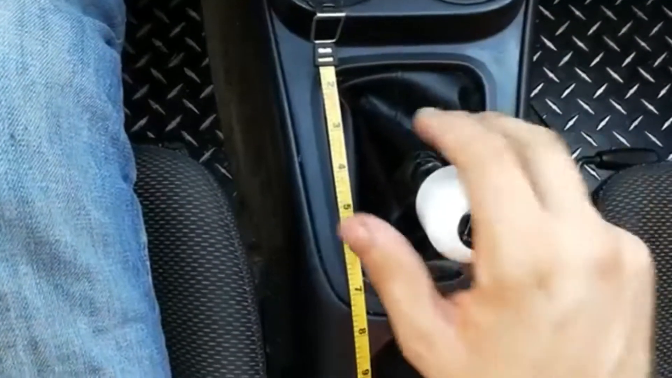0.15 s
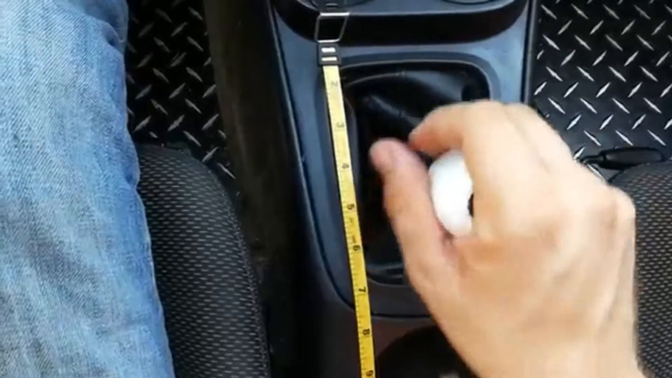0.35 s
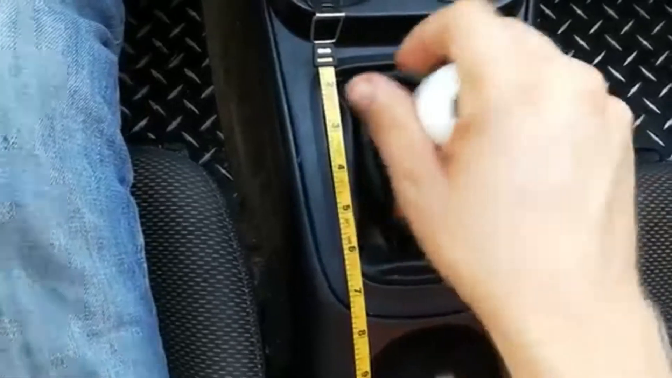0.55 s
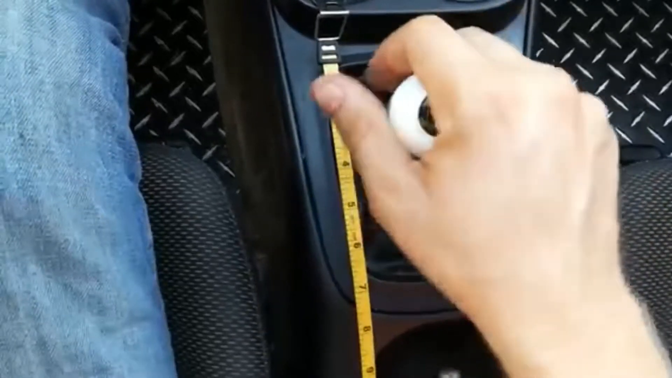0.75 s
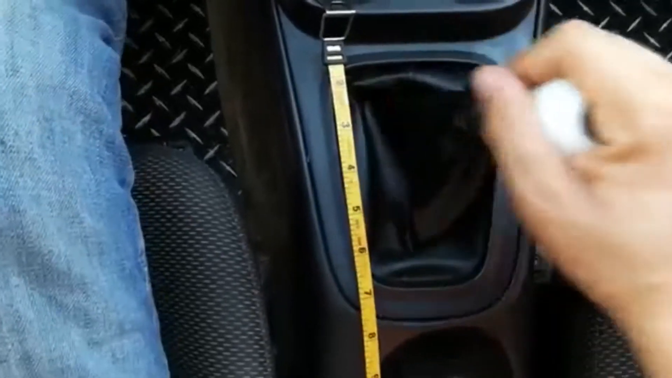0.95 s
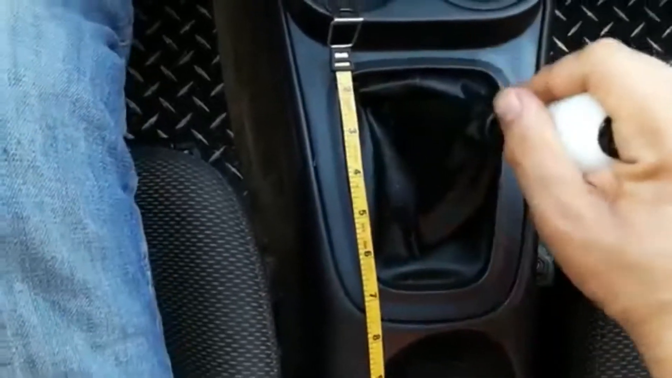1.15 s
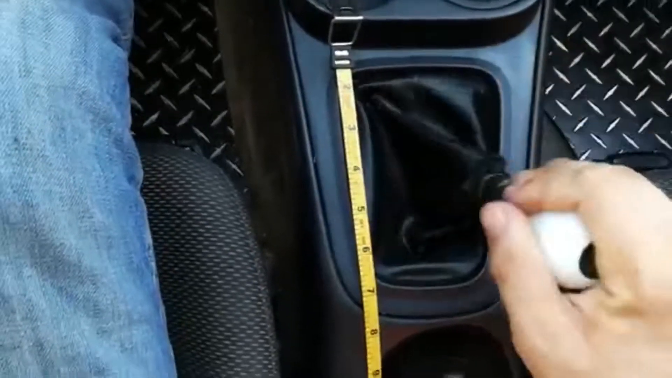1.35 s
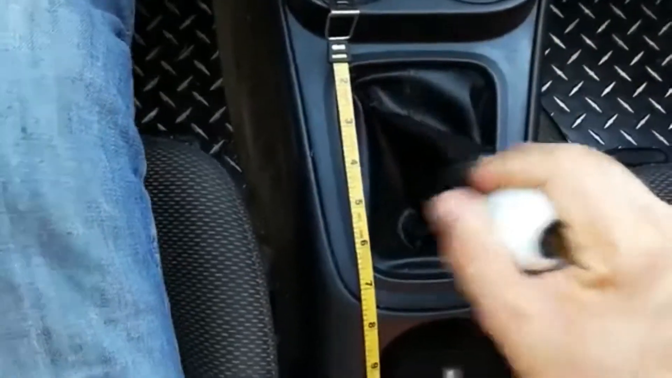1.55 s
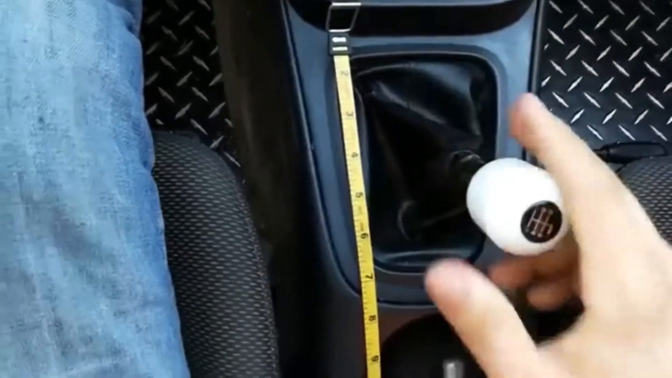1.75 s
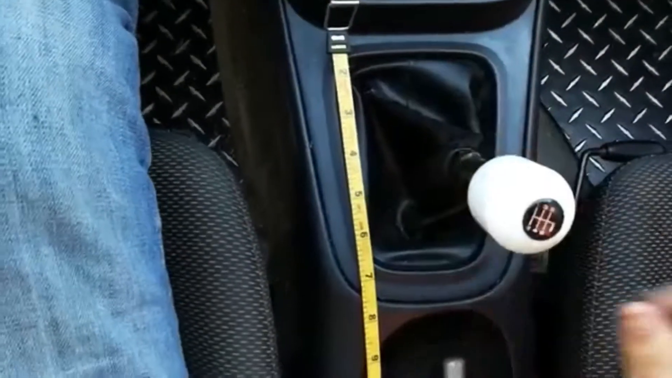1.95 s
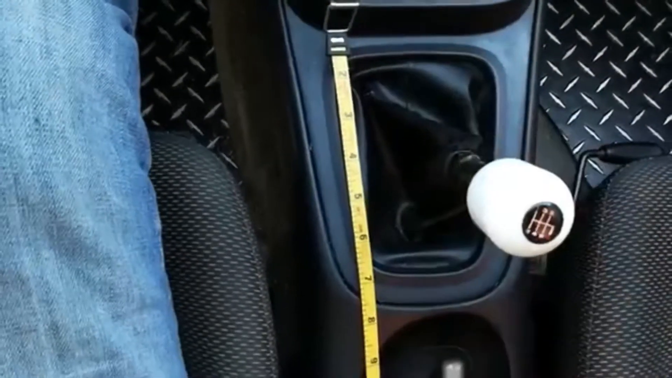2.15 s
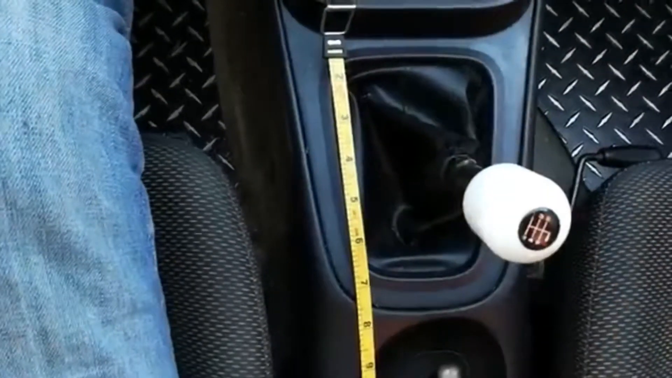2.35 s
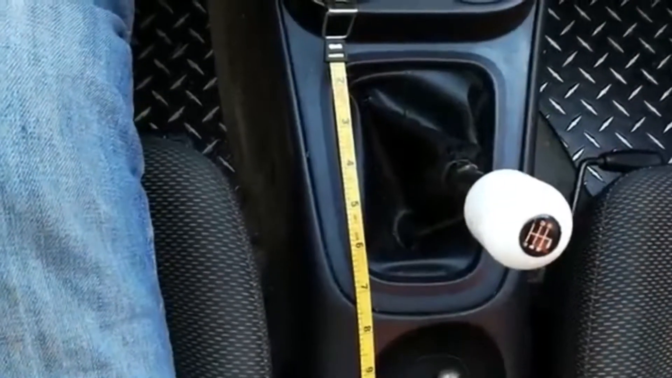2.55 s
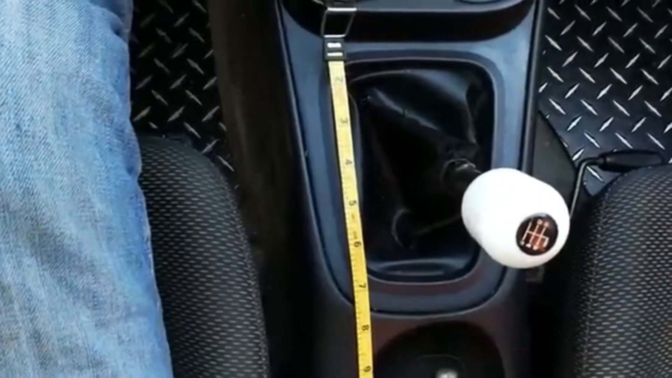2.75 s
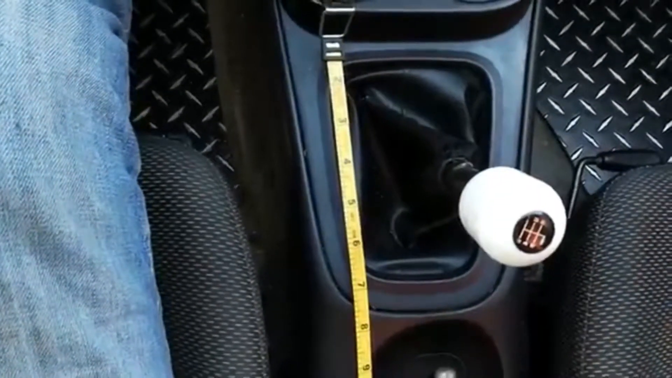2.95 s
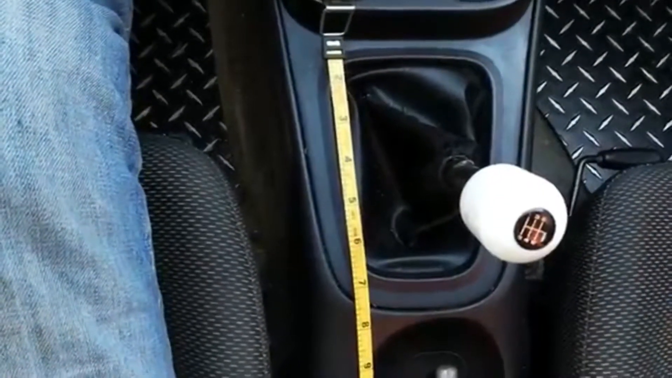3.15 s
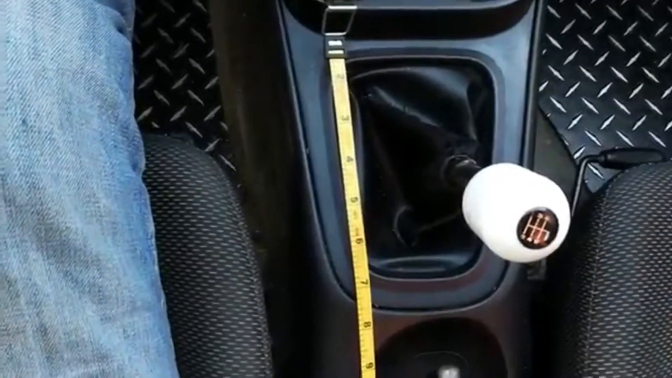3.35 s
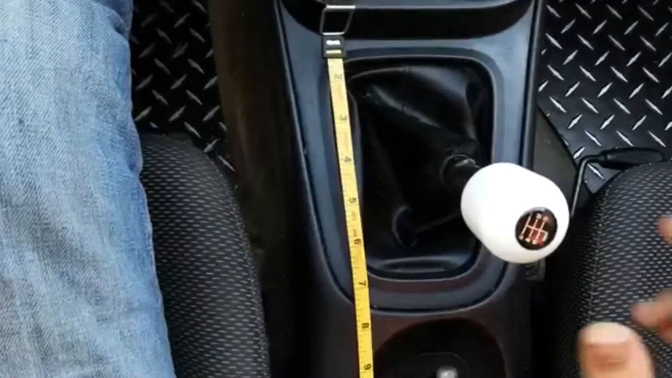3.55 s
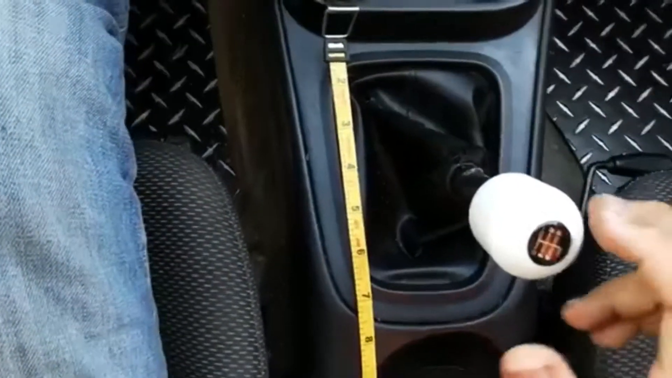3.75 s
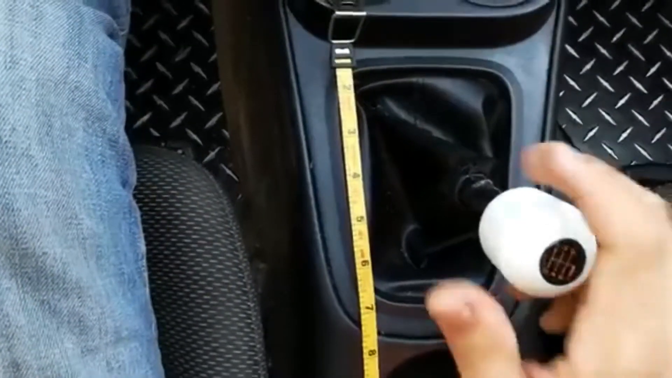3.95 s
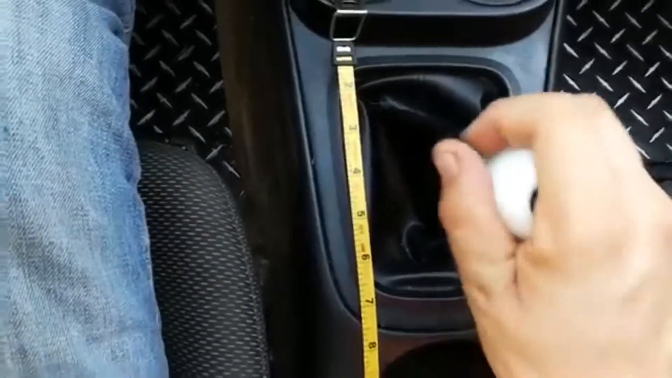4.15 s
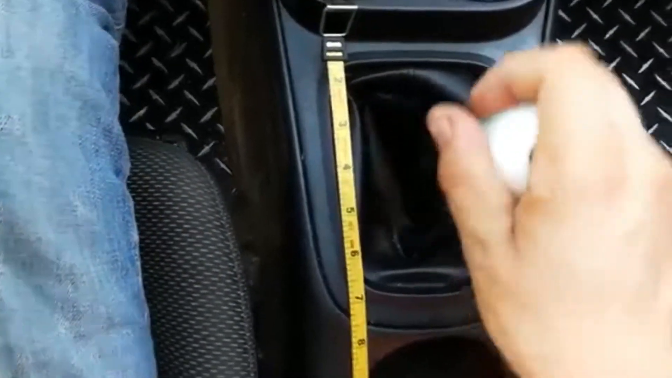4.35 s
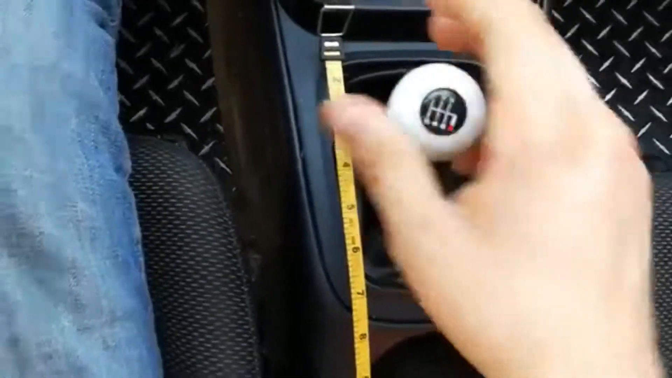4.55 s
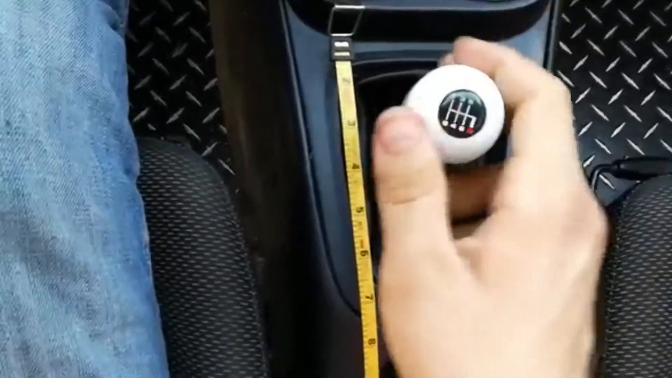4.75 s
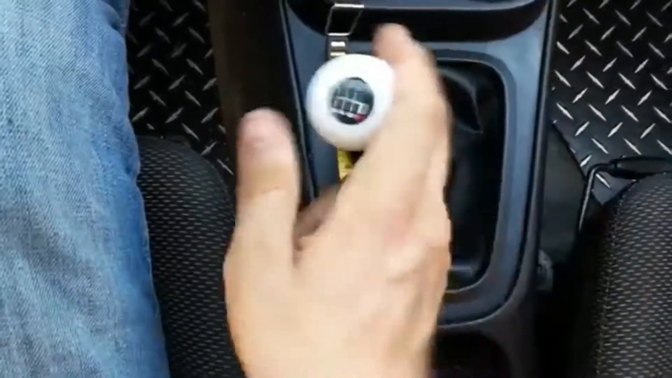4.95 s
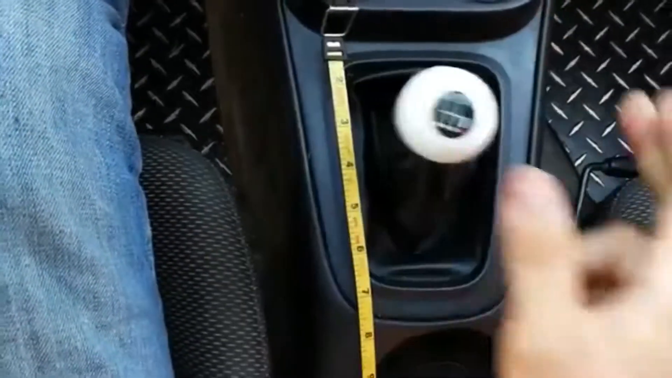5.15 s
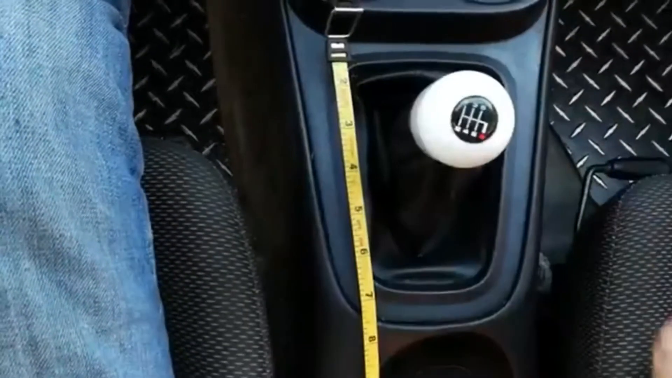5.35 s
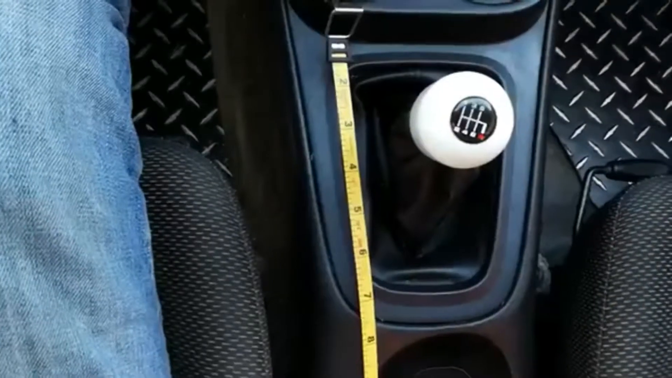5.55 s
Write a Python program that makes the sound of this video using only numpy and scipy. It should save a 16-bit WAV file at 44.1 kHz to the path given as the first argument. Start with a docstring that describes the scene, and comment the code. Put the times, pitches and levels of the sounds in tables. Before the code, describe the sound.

Inside a parked car, a hand works a short gear lever close to the microphone. A quick run of metal clicks, brief scrapes and dull thumps through the console fills the first second and a half. After a pause with one faint tick, the lever snaps through two more shifts, with the sharpest click and a cluster of clunks. Faint hiss, rumble and motor hum lie underneath.

```python
"""Inside a parked car, a hand throws a short gear lever from gate to gate, close to a two-microphone phone.
Each stop thumps the floor pan, console and trim. The steel linkage clicks as it makes contact and
scrapes as it slides, skin brushes the knob, and the cabin answers briefly.
Underneath, a faint motor hum and outside rumble seep in below the microphone hiss."""
import sys
import numpy as np
from scipy import signal
from scipy.fft import rfft, irfft, next_fast_len
from scipy.io import wavfile
from scipy.ndimage import uniform_filter1d

SR = 44100
rng = np.random.default_rng(int(sys.argv[2]) if len(sys.argv) > 2 else 0)


def unload_wav(signal):
    """Save mono or channel-first audio to the path in sys.argv[1] as 16-bit WAV at rate SR, clipped to [-1, 1]."""
    wavfile.write(
        sys.argv[1],
        SR,
        np.round(np.clip(np.atleast_2d(signal).T, -1, 1) * 32767).astype(np.int16),
    )


N = 246959
TIME = np.arange(N) / SR

# Resonances of the panels and the lever's parts: (frequency [Hz], level [dB], t60 [s])
CONSOLE_MODES = [(116.74, -1.5, 0.1422), (135.7, 0, 0.1884), (218.8, -5, 0.0752)]
TRIM_MODES = [(278.54, -2, 0.0505), (324.2, 1.5, 0.0759), (352.5, 0.5, 0.0353), (528.9, -7.5, 0.062)]
KNOB_MODES = [(666, 2.5, 0.01103), (829.5, -2, 0.02514), (984.8, -2, 0.02454)]
ROD_MODES = [(1432.6, -3.5, 0.0107), (1731, -0.09, 0.01178), (2101, 0.75, 0.0051)]
FORK_MODES = [(2904, -1, 0.00315), (3588, -6, 0.0105), (3658, -10, 0.0169), (4243, -0.5, 0.00542),
              (4540, -46.5, .012), (6308, -21, 0.0207)]


def undb(db):
    """Decibels to gain."""
    return 10 ** (np.asarray(db) / 20)


def level(x, db):
    """Scale to an rms level."""
    return x * undb(db) / np.sqrt(np.mean(x ** 2))


def colour(x, curve, lag_ms=0.):
    """EQ along a curve of (frequency [Hz], gain [dB]), with an optional delay."""
    hz, db = np.transpose(curve)
    size = next_fast_len(N)
    f = np.arange(size // 2 + 1) * SR / size
    gain = undb(np.interp(np.log(f + 1), np.log(hz), db))
    delay = np.exp(-2j * np.pi * f * lag_ms / 1000)
    return irfft(rfft(x, size) * gain * delay, size)[:N]


def wander(rate_hz):
    """Smooth random drift with a spread near 1."""
    hold = int(SR / rate_hz)
    steps = np.repeat(rng.standard_normal(N // hold + 1), hold)
    return 1.3 * uniform_filter1d(uniform_filter1d(steps, hold), hold)[:N]


def ring(force, modes, spot_db=0.):
    """Decaying modes, neighbours in opposite phase; the strike spot favours some at random."""
    out = 0
    for k, (hz, db, t60) in enumerate(modes):
        r, w = np.exp(-np.log(1000) / (t60 * SR)), 2 * np.pi * hz / SR
        gain = (-1) ** k * undb(db + spot_db * rng.standard_normal())
        out = out + gain * signal.lfilter([0, r * np.sin(w)], [1, -2 * r * np.cos(w), r * r], force)
    return out


def facing(deg, off_axis_db):
    """Gains of three parts: full when struck along their axis, off_axis_db when struck square to it."""
    axes_deg = np.array([60, 180, 300])
    return undb(off_axis_db * (1 - np.cos(np.radians(deg - axes_deg))))


def cabin(x):
    """Three noises to stereo: one is the direct sound, two are each side's glass and trim reflections."""
    return x[0] + undb(-2.5) * x[1:]


def crack(x):
    """The broad, unringing top of metal contact."""
    return signal.sosfilt(signal.butter(2, [4500., 11500.], "band", fs=SR, output="sos"), x)


def mic_hiss():
    """Each capsule hisses on its own, the left a little louder."""
    # Tone of the hiss: (frequency [Hz], gain [dB])
    hiss_curve = [(470, -3), (800, 1.5), (928, 0.5), (1120, -0.5), (1220, 1), (2400, -1), (14400, -12.5),
                  (15300, -22)]
    return np.array([level(colour(rng.standard_normal(N), hiss_curve), db) for db in (-69.5, -71.3)])


def motor_hum():
    """A faint motor: narrow bands of noise waver like unsteady tones."""
    # Partials of the hum: (frequency [Hz], bandwidth [Hz], level [dB])
    partials = [(119, 8, -76), (238, 12, -77), (354, 6, -86)]
    return sum(level(signal.lfilter(*signal.iirpeak(hz, hz / width, SR), rng.standard_normal(N)), db)
               for hz, width, db in partials)


def ambience():
    """Outside rumble and motor hum arrive from the left, over a deep, centred rumble that swells."""
    # Tone of the outside rumble: (frequency [Hz], gain [dB])
    outside_curve = [(59, -25), (100, -16.5), (127, -17.5), (150, -4), (226, 3.5), (297, -4), (360, -8),
                     (446, -9), (1500, -25.5), (1950, -57.5), (3300, -120)]
    # Rise and fall of the deep rumble: (time [s], level [dB])
    swell = [(0.0, -63), (.5, -57.5), (1.74, -59.5), (3.37, -66), (4.46, -65), (4.9, -58.5), (5.08, -48),
             (5.29, -59.5), (5.6, -59.5)]
    near, spread, deep = rng.standard_normal((3, N))
    flicker = undb(1.5 * wander(4))
    left, right = [level(colour(x, outside_curve), -67) * flicker for x in (near, near + 0.33 * spread)]
    deep = level(colour(deep, [(12, -20.5), (25, 6.0), (60, 0), (120, -4.5), (200, -34.5), (400, -92)]), 0)
    deep *= undb(np.interp(TIME, *np.transpose(swell)) + 2.5 * wander(12))
    hum = motor_hum()
    return np.array([left + hum, colour(right + hum, [(1, 0.0043)], lag_ms=0.672)]) + deep


def hand_brushes():
    """Skin brushes the knob: soft, high swishes."""
    # Touches of the hand: (time [s], half length [s], level [dB])
    brushes = [(0.39, 0.0292, -70), (4.119, 0.023, -65.5)]
    envelope = sum(undb(db) * np.exp(-((TIME - s) / half) ** 4) for s, half, db in brushes)
    skin_band = signal.butter(2, [5000., 8000.], "band", fs=SR, output="sos")
    return envelope * level(signal.sosfilt(skin_band, cabin(rng.standard_normal((3, N)))), 0)


def stick_slip(slips_per_s, spread_db):
    """Friction grit: three streams of dense random slips of uneven size."""
    slips = rng.random((3, N)) < slips_per_s / SR
    return slips * rng.standard_normal((3, N)) * undb(spread_db * wander(150))


def lever_scrapes():
    """The sliding lever scrapes its guides in fine slips; the rod passes them on and shakes the panels."""
    # Lever travel: (start [s], peak [s], time to fall 20 dB [s], rod drive [dB], fork drive [dB])
    slides = [(0.336, 0.415, 0.16, -62.5, -68), (0.497, 0.537, 0.0573, -54, -70),
              (0.523, 0.602, 0.1018, -51, -60), (0.814, 0.825, 0.2928, -62, -68.5),
              (0.854, 1.011, 0.0547, -60, -58), (1.202, 1.214, 0.0491, -56, -59.5),
              (1.228, 1.349, 0.1025, -55.5, -56), (1.563, 1.573, 0.0419, -57, -52),
              (1.575, 1.581, 0.1256, -55, -66), (4.064, 4.104, 0.1086, -56, -67),
              (4.366, 4.381, 0.0914, -45, -59), (4.414, 4.453, 0.0338, -40.5, -55.5),
              (4.892, 4.901, 0.251, -53, -62), (5.042, 5.1, 0.0593, -51, -56.5),
              (5.106, 5.154, 0.0014, -57.5, -58.5), (5.433, 5.505, 0.0465, -67, -78.5)]
    # Resonance of the guide: (frequency [Hz], level [dB], t60 [s])
    guide_modes = [(3261, 0, 0.00225)]
    drive = np.zeros((2, N))
    for start, peak, fall_s, rod_db, fork_db in slides:
        rise = np.clip((TIME - start) / (peak - start), 0, 1)
        fall = undb(-20 * np.maximum(TIME - peak, 0) / fall_s)
        drive += np.outer(undb([fork_db, rod_db]), rise * fall)
    fork_drive, rod_drive = uniform_filter1d(drive, size=200)
    grit = cabin(stick_slip(slips_per_s=8000, spread_db=2.2))
    guide = level(np.diff(ring(grit, guide_modes), prepend=0), -0.31)
    fork = level(crack(grit), -15.5) + level(ring(grit, FORK_MODES), -3.0)
    rod = level(ring(grit, KNOB_MODES + ROD_MODES), -3.0)
    rocking = uniform_filter1d(rng.standard_normal(N), size=60)
    panels = level(ring(rocking, CONSOLE_MODES), 3.5) + level(ring(rocking, TRIM_MODES), 0)
    return fork_drive * (fork + guide) + rod_drive * (rod + panels)


def linkage_clicks():
    """Each click is a dying rattle of contacts on knob, rod and fork, with a bare crack on top."""
    # Metal contacts: (time [s], strength [dB], direction [deg], crack [dB], rattle t60 [s])
    contacts = [(0.416, -49, 235.4, -71, 0.028), (0.4978, -59, 335, -78.5, 0.021),
                (0.531, -49.5, 320, -77, 0.051), (0.5588, -49, 380, -69.5, 0.022),
                (0.583, -48.5, 318, -78.5, 0.027), (0.8231, -57.5, 265, -74, 0.025),
                (0.8444, -47.5, 138.4, -67, 0.029), (0.8729, -43.5, 280.3, -78, 0.0194),
                (0.9281, -34.5, 347.3, -47, 0.0254), (0.9649, -51, 180, -59, 0.0186),
                (0.9856, -47.5, 212.6, -54, 0.049), (1.0107, -47.5, 93, -51, 0.036),
                (1.2108, -47.5, 226.5, -58, 0.033), (1.258, -48, 252, -57.5, 0.04),
                (1.271, -40.5, 241.3, -52.5, 0.0327), (1.3211, -43, 125, -56.5, 0.086),
                (1.3561, -37.5, 135, -63.5, 0.0126), (1.3685, -44, 256, -51, 0.016),
                (1.5698, -34, 278.4, -55, 0.0322), (1.584, -32.5, 295.4, -73.5, 0.037),
                (2.3309, -53, 345.6, -67, 0.066), (4.1046, -46.5, 343, -63, 0.0206),
                (4.2488, -58.5, 66, -80.5, 0.0197), (4.3203, -59, 97, -79, 0.044),
                (4.3785, -36.5, 313, -72.5, 0.0454), (4.4061, -33, 269, -49.5, 0.0393),
                (4.4434, -26.5, 257.3, -36.5, 0.0257), (4.4776, -41.5, 259.4, -73.5, 0.047),
                (4.638, -55, 57, -81, 0.0266), (4.8999, -33.5, 307, -51.5, 0.0155),
                (5.0044, -49.5, 140, -77.5, 0.029), (5.0486, -52, 106, -71, 0.025),
                (5.0688, -46.5, 370, -73, 0.0166), (5.0856, -34, 320, -66.5, 0.044),
                (5.0993, -35.5, 298, -66, 0.0277), (5.1182, -34.5, 286, -64, 0.0496),
                (5.1396, -41, 243.3, -51.5, 0.0496), (5.188, -56, 123, -69, 0.028)]
    parts, part_db = (KNOB_MODES, ROD_MODES, FORK_MODES), [-13.5, -15, -20.5]  # how readily each rings
    attack_s, cabin_tail_s = 0.000223, 0.025
    t = np.arange(6144) / SR
    attack = np.minimum(t / attack_s, 1)
    out = np.zeros((2, N + len(t)))
    for s, db, deg, crack_db, t60 in contacts:
        t60s = t60 + np.array([[0], [cabin_tail_s], [cabin_tail_s]])  # reflections hang on longer
        rattle = cabin(rng.standard_normal((3, len(t))) * np.exp(-np.log(1000) * t / t60s) * attack)
        gains = undb(db) * undb(part_db) * facing(deg, off_axis_db=-11.5)
        lever = sum(gain * ring(rattle, modes, spot_db=3.0) for modes, gain in zip(parts, gains))
        i = int(s * SR)
        out[:, i:i + len(t)] += lever + undb(crack_db) * crack(rattle)
    return out[:, :N] * undb([[-1.25], [1.25]])  # nudged to the right


def gate_thumps():
    """Each stop is a smooth push that rings floor pan, console and trim as its direction favours them."""
    # Stops and bumps of the lever: (time [s], strength [dB], direction [deg], contact time [ms])
    stops = [(0.381, -50, 262, 0.72), (0.419, -45, 271, 1.24), (0.539, -29, 325, 2.97),
             (0.56, -31.5, 251, 2.65), (0.572, -31.5, 377, 1.08), (0.615, -34.5, 205, 0.52),
             (0.634, -35.5, 192, 0.97), (0.838, -34, 249, 2.34), (0.868, -39, 242.4, 1.97),
             (0.931, -25, 241.5, 2.19), (0.965, -37.5, 218, 1.55), (1.006, -20, 312.3, 3.5),
             (1.019, -30.5, 212.5, 3.6), (1.229, -43.5, 300, 1.07), (1.339, -22, 182.5, 5.34),
             (1.353, -22, 360.4, 1.82), (1.365, -30, 387, 3.62), (1.42, -39, 129, 1.22),
             (1.458, -35.5, 87, 1.86), (1.498, -41.5, 80.7, 1.16), (1.575, -31.5, 300, 0.99),
             (1.591, -29.5, 228.3, 1.3), (1.604, -29.5, 124, 1.21), (1.738, -48.5, 252, 2.23),
             (2.394, -38.5, 69, 1.58), (2.449, -47, 81, 1.42), (4.095, -31, 254, 3.7),
             (4.11, -31.5, 347.3, 1.62), (4.254, -41.5, 235, 1.86), (4.32, -33.5, 288, 2.57),
             (4.375, -26, 229.4, 2.056), (4.408, -25, 354.3, 1.12), (4.446, -25, 233.2, 1.076),
             (4.49, -28.5, 116.7, 3.83), (4.632, -32.5, 306, 4.95), (4.907, -21, 241.3, 2.11),
             (4.975, -22, 295, 2.76), (5.076, -20.5, 269, 3.36), (5.096, -25.5, 232.7, 1.07),
             (5.115, -23.5, 301, 4.01), (5.151, -22.5, 272.8, 3.27), (5.199, -34, 216.2, 1.24)]
    # Boom of the floor pan: (frequency [Hz], level [dB], t60 [s])
    floor_modes = [(56.4, -8.5, 0.19), (74.76, -2.5, 0.1366)]
    force = np.zeros((3, N))
    for s, db, deg, contact_ms in stops:
        push = np.hanning(max(int(contact_ms * SR / 1000), 3))
        gains = undb(db) * facing(deg, off_axis_db=-12.5)
        i = int(s * SR)
        force[:, i:i + len(push)] += np.outer(gains, push / push.sum())
    return ring(force[0], floor_modes) + ring(force[1], CONSOLE_MODES) + ring(force[2], TRIM_MODES)


def phone_shadow(left, right):
    """The left microphone is nearer the lever; the phone's body shades the right one."""
    # Difference between the sides: (frequency [Hz], left minus right [dB], left lead [rad])
    shadow = [(60, -0.5, 0.087), (165, 0, 0.34), (254.5, 0.5, 0.638), (437, 5.5, 1.086), (693, 7.5, 3.67),
              (1010, 10.5, 6.43), (1253, 11, 6.5), (1676, 2, 7.203), (2572, 11, 7.84), (3600, 8.5, 13.18),
              (4150, 9, 14.19), (14934, 7.5, 47.1)]
    hz, db, lead = np.transpose(shadow)
    size = next_fast_len(N)
    f = np.arange(size // 2 + 1) * SR / size
    tilt = undb(np.interp(np.log(f + 1), np.log(hz), db / 2))
    lag = np.exp(-1j * np.interp(f, hz, lead))
    return irfft([rfft(left, size) * tilt, rfft(right, size) * lag / tilt], size)[:, :N]


def scene():
    """The gear lever, close and to the left, over the ambience and hiss."""
    lever = gate_thumps() + linkage_clicks() + lever_scrapes() + hand_brushes()
    return phone_shadow(*lever) + ambience() + mic_hiss()


def record(dry):
    """The phone trims the deepest bass and cuts the top."""
    low_cut = signal.butter(2, 18., "high", fs=SR, output="sos")
    high_cut = signal.ellip(10, .2, 80, 15000, fs=SR, output="sos")
    return signal.sosfilt(np.vstack([low_cut, high_cut]), dry)


dry = scene()
out = record(dry)
unload_wav(out)
```